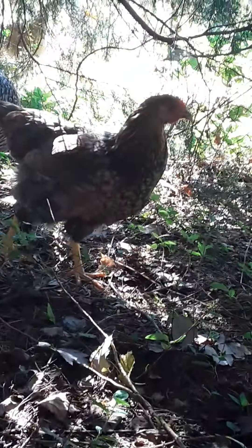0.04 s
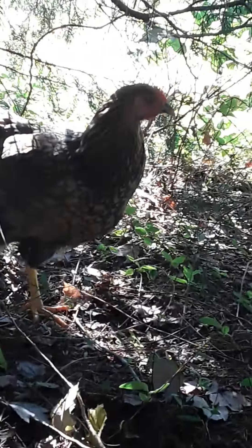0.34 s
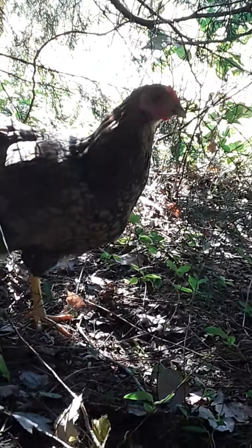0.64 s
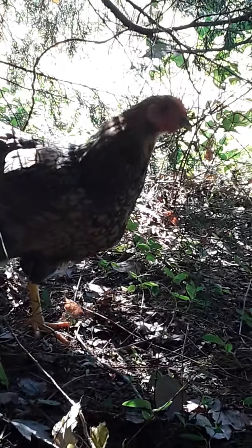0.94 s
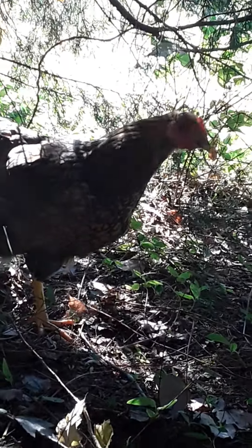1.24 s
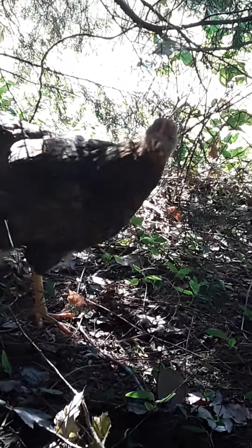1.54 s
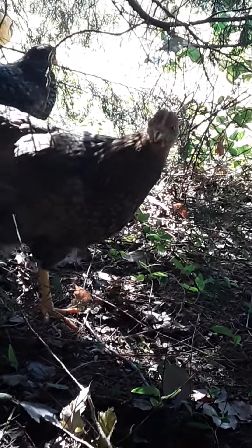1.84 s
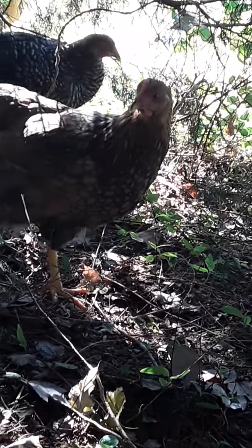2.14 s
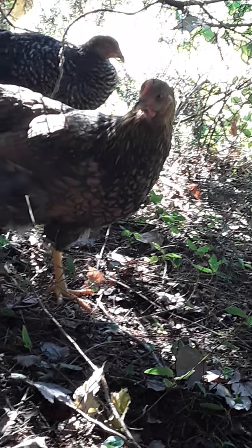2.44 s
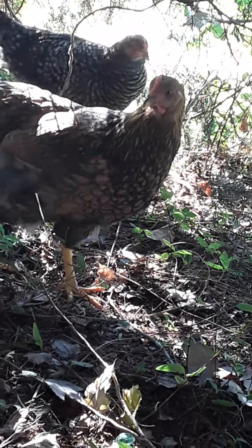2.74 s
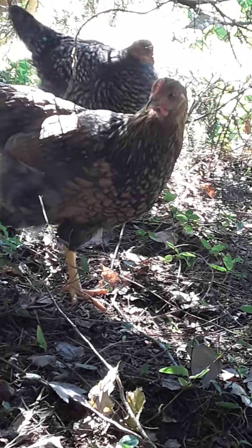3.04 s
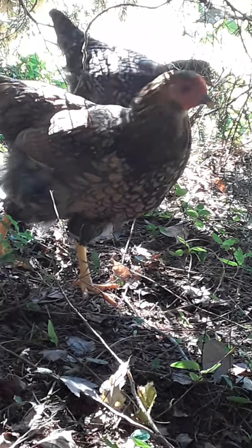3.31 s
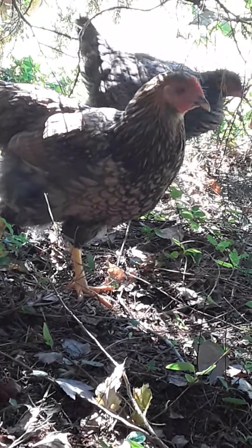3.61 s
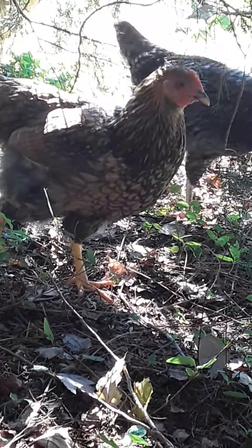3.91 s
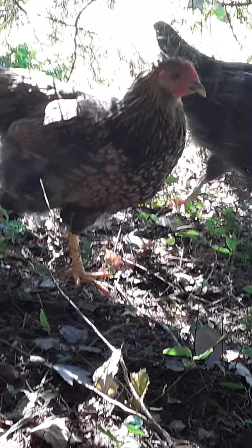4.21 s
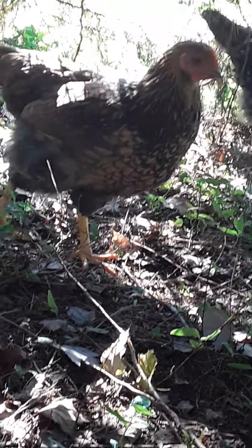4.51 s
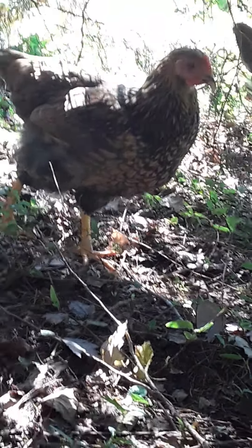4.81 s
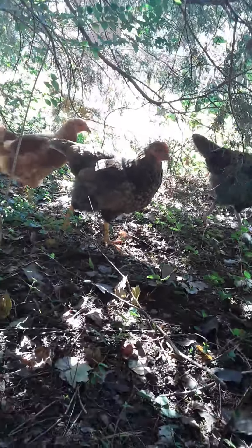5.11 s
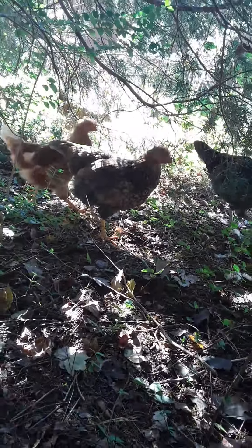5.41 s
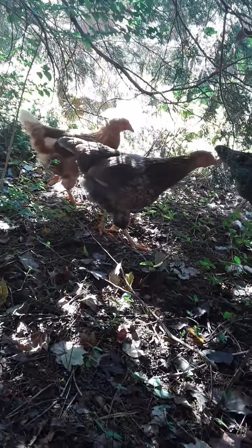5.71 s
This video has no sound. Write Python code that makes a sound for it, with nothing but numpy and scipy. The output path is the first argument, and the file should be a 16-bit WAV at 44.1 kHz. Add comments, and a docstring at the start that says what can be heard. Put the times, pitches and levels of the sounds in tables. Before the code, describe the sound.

Under trees, a cricket close to the microphone chirps in loud, high, rapid pulses over other crickets and a far rumble. At the start a hen's foot drags through dry leaves and twigs snap. A low-voiced hen softly croons, clucks and moans while a small bird twitters farther off. Later a higher hen clucks and whines. Near the end come more faint twitters and a brief close rustle.

```python
"""Under trees, one microphone by dry leaf litter. Throughout, a near cricket scrapes its wings in loud
pulses over slower neighbours, fast ground crickets and a far rumble. At the start a hen's foot drags
through the leaves and twigs snap. From 1 s a low-voiced hen croons, clucks and moans while a small bird
twitters farther off; from 3 s a high-voiced hen clucks and whines. Near 5 s the bird twitters again
and there is a brief close rustle, like a finger sliding by the microphone."""
import sys
import numpy as np
from scipy import signal
from scipy.fft import rfft, irfft, next_fast_len
from scipy.io import wavfile
from scipy.ndimage import map_coordinates

SR = 44100
rng = np.random.default_rng(int(sys.argv[2]) if len(sys.argv) > 2 else 0)


def bounce(signal):
    """Save signal as a 16-bit WAV file at the path given by the first command-line argument."""
    frames = np.transpose(np.atleast_2d(signal))
    limited = np.clip(frames, -1, 1)
    pcm = np.round(limited * 32767).astype(np.int16)
    wavfile.write(sys.argv[1], SR, pcm)


N = 262395
T = np.arange(N) / SR
CUTOFF_HZ = 15700


def from_db(db):
    """Decibels to gain."""
    return 10 ** (np.asarray(db) / 20)


def rms_one(x):
    """Scale to rms 1."""
    return x / np.sqrt(np.mean(x ** 2) + 1e-20)


def in_time(rows):
    """Each column of a timed curve at every sample."""
    times, *columns = np.transpose(rows)
    return [np.interp(T, times, column) for column in columns]


def gain_at(spectrum, hz):
    """Gain of a spectrum at any frequency."""
    points_hz, level_db = np.transpose(spectrum)
    return from_db(np.interp(np.log(hz + 1), np.log(points_hz), level_db))


def coloured(x, spectrum):
    """Give a signal a spectrum that falls away beyond its ends; rms 1."""
    size = next_fast_len(len(x) + SR // 10, True)
    hz = np.arange(size // 2 + 1) * SR / size
    skirts = np.minimum(1, hz / spectrum[0][0]) ** 2 / np.maximum(1, hz / spectrum[-1][0]) ** 6
    return rms_one(irfft(rfft(x, size) * gain_at(spectrum, hz) * skirts, size)[:len(x)])


def drift(per_s):
    """A smooth random curve that changes about per_s times a second; rms 1."""
    return rms_one(map_coordinates(rng.standard_normal(N // 8), [T * per_s + 2], order=3, mode="wrap"))


def phase_of(hz):
    """Phase of a moving pitch."""
    return 2 * np.pi * np.cumsum(hz) / SR


# Spectra of the distance. Each row: frequency in Hz, relative level in dB.
RUMBLE_SPECTRUM = [(20, -16), (28, -17), (45, -12.5), (68, -3.5), (92, 2), (120, -3), (150, -3.5),
                   (180, -10.5), (220, -16.5), (310, -23), (500, -30.5)]
AIR_SPECTRUM = [(250, -11), (500, 0.5), (1000, -3), (1800, -5.5), (2700, -4), (3800, 0), (5000, 4.5),
                (7000, -1), (10000, -39), (15000, -22)]
INSECT_SPECTRUM = [(4500, -17), (5500, 1), (6400, -3), (7000, 4.5), (7600, 1), (8000, -25), (8600, -7),
                   (9500, -63), (11000, -65)]


def background(rumble_db=-53, air_db=-61, insects_db=-53):
    """Far rumble, open air and the blur of many distant insects."""
    layers = [(RUMBLE_SPECTRUM, rumble_db), (AIR_SPECTRUM, air_db), (INSECT_SPECTRUM, insects_db)]
    return sum(from_db(db) * coloured(rng.standard_normal(N), spectrum) for spectrum, db in layers)


# Crickets far from the microphone. Each row: pitch in Hz, level in dB.
RING_TONES = [(5690, -63.5), (6070, -60.5), (7726, -51)]


def far_rings(waver_hz=28, flutter_db=3):
    """Many distant trills merge into thin, wavering tones."""
    out = 0
    for hz, level_db in RING_TONES:
        gain = from_db(level_db + flutter_db * drift(40))
        out += gain * np.sin(phase_of(hz + waver_hz * drift(120)))
    return out


# Crickets on the ground, some way off. Each row: strokes per second, start and end pitch in Hz,
# sounding share of each beat, level in dB.
GROUND_TRILLS = [(48.66, 7500, 6250, 0.3, -42.5), (54.86, 7830, 7300, 0.2, -38.5),
                 (74.6, 7300, 6400, 0.5, -46.5), (68.8, 7920, 7500, 0.6, -45.5)]


def ground_crickets(unsteady=0.04, swell_db=2.0, waver_hz=50, ramp_share=0.24, fading_db=7):
    """Fast trills of short wing strokes; each starts quickly, then slides down and fades."""
    out = 0
    for per_s, start_hz, end_hz, share, level_db in GROUND_TRILLS:
        strokes = np.cumsum(per_s * (1 + unsteady * drift(7))) / SR + rng.random()
        place = np.minimum(strokes % 1 / share, 1)  # 0 to 1 within a stroke
        ramps = np.minimum(np.minimum(place, 1 - place) / ramp_share, 1)
        envelope = ramps * from_db(fading_db * (0.5 - place))
        pitch = start_hz + (end_hz - start_hz) * place + waver_hz * drift(150)
        out += from_db(level_db + swell_db * drift(30)) * envelope * np.sin(phase_of(pitch))
    return out


# A small bird at a distance. Each row: start and length of a run in seconds, first note's level in dB.
TWITTER_RUNS = [(1.235, 0.15, -53), (1.673, 0.1, -48.5), (4.524, .126, -56), (4.946, .098, -52.5)]


def twitter_notes(every_s=0.028, note_s=0.0232, start_hz=3623, end_hz=3250, growth_db=1.0):
    """Evenly spaced falling notes, all much alike, that grow louder through each run."""
    notes = []
    for start, length, first_db in TWITTER_RUNS:
        for k in range(int(np.ceil(length / every_s))):
            tune = 1 + 0.0206 * rng.standard_normal()
            level_db = first_db + k * growth_db - 0.5 * rng.standard_normal()
            notes.append((start + k * every_s, tune * start_hz, tune * end_hz, note_s, level_db))
    return notes


# Lone distant chirps. Each row: start in seconds, start and end pitch in Hz, length in seconds,
# level in dB.
BIRD_CHIRPS = [(.29, 1830, 2230, 0.057, -58.5), (2.442, 8570, 7830, 0.041, -50.5),
               (3.298, 2060, 2140, 0.031, -55.5)]


def birds(waver_hz=45):
    """Twitters and chirps: short, nearly pure gliding notes."""
    out, waver = np.zeros(N), waver_hz * drift(600)
    for start, start_hz, end_hz, length, level_db in twitter_notes() + list(BIRD_CHIRPS):
        place = np.linspace(0, 1, int(length * SR))
        span = int(start * SR) + np.arange(len(place))
        pitch = start_hz + (end_hz - start_hz) * place + waver[span]
        out[span] += from_db(level_db) * np.sin(np.pi * place) * np.sin(phase_of(pitch))
    return out


def swell(peak_s, rise_s, fall_s):
    """A movement builds up to its peak and dies away."""
    return np.exp(-np.maximum((peak_s - T) / rise_s, (T - peak_s) / fall_s))


def dry_ticks(spectrum, per_s, spread_db):
    """Countless tiny ticks, as of dry leaves breaking, most faint and a few strong."""
    sizes = from_db(spread_db * np.minimum(rng.exponential(1, N), 4)) * rng.standard_normal(N)
    return coloured(sizes * (rng.random(N) < per_s / SR), spectrum)


# Brief close rustles: first a foot in the leaves, then near 5 s a sound like a sliding finger.
# Each row: peak time in seconds, relative level in dB, rise and fall in seconds.
CLOSE_RUSTLES = [(.15, -46.5, 0.022, 0.068), (4.885, -49, 0.052, 0.074), (5.338, -54.5, .022, 0.0097)]
# Light steps. Each row: peak time in seconds, relative level in dB, fall in seconds.
LIGHT_STEPS = [(.16, -68, 0.13), (.56, -72.5, .06), (1.52, -66.5, 0.017), (1.615, -69.5, 0.033),
               (1.745, -69.5, .07), (1.995, -72, 0.015), (2.97, -77, 0.034), (3.25, -74.5, 0.082),
               (3.71, -67.5, 0.089), (3.93, -71, 0.071), (4.24, -63.5, 0.06), (4.79, -65, 0.026),
               (4.94, -69, 0.06), (5.79, -71, 0.029)]
# The flock's constant stirring. Each row: time in seconds, relative level in dB.
FLOCK_STIR = [(0, -76), (1.2, -79.5), (2.4, -79.5), (2.9, -84), (4.1, -79), (5.1, -74), (5.7, -74),
              (5.95, -81.5)]
# The rustles' coarse crunch and the leaves' fine crackle. Each row: frequency in Hz, relative level in dB.
CRUNCH_SPECTRUM = [(200, -2), (450, -2.5), (1000, -10.5), (1500, 5.5), (2300, 6), (3300, 4), (4500, 2),
                   (7000, -23), (10000, -10), (15000, -33)]
CRACKLE_SPECTRUM = [(600, -6.5), (2000, -17.5), (3000, -3), (4000, 5.5), (6000, -7), (8500, 2),
                    (10500, -15), (13000, -13), (15500, -23)]


def rustling(crunch_db=2, crackle_db=17, step_rise_s=0.028):
    """Close rustles swell in coarse crunches; light steps lift the leaf litter's fine crackle."""
    rustles = sum(from_db(db) * swell(at, rise_s, fall_s) for at, db, rise_s, fall_s in CLOSE_RUSTLES)
    steps = [from_db(db) * swell(at, step_rise_s, fall_s) for at, db, fall_s in LIGHT_STEPS]
    stirring = np.linalg.norm(steps + [from_db(in_time(FLOCK_STIR)[0])], axis=0)  # powers add
    crunch = dry_ticks(CRUNCH_SPECTRUM, per_s=3200, spread_db=3.3)
    crackle = dry_ticks(CRACKLE_SPECTRUM, per_s=12000, spread_db=2.2)
    return from_db(crunch_db) * rustles * crunch + from_db(crackle_db) * stirring * crackle


# Twig snaps and pecks close by. Each row: start in seconds, peak level in dB, band centre in Hz.
TWIG_SNAPS = [(0.1361, -23, 3030), (0.164, -31, 3600), (.191, -32, 2460), (0.2162, -36, 2160),
              (0.388, -45, 3600), (1.607, -30, 3970), (1.742, -38, 4930), (2.1478, -29.5, 2900),
              (2.3122, -35.5, 3115), (2.7491, -44.5, 1010), (3.2693, -42.5, 3664), (4.9953, -37, 3070),
              (5.514, -42, 6000), (5.7848, -38, 4160)]


def snaps(fracture_s=0.001, rattle_db=-28, rattle_s=0.011):
    """A brief dry crack with a faint rattle after it; thinner twigs crack brighter."""
    out, t = np.zeros(N), T[:SR // 20]
    envelope = np.exp(-t / fracture_s) + from_db(rattle_db) * np.exp(-t / rattle_s)
    for start, peak_db, hz in TWIG_SNAPS:
        crack = rng.standard_normal(len(t)) * envelope
        highpass = signal.butter(2, hz / 2, "high", fs=SR, output="sos")
        lowpass = signal.butter(4, min(1.76 * hz, CUTOFF_HZ), fs=SR, output="sos")
        snap = signal.sosfilt(lowpass, signal.sosfilt(highpass, crack))
        at = int(start * SR)
        out[at:at + len(t)] += from_db(peak_db) * snap / np.abs(snap).max()
    return out


def hen_voice(call, throat, jitter, doubling, rasp_db, shimmer_db, tight_db=0,
              tight_hz=1057, tight_width_hz=150, fade_s=0.0056):
    """Harmonics of the syrinx through the throat; when hoarse it shakes, rasps and doubles its period."""
    gate = np.clip(np.minimum(T - call[0][0], call[-1][0] - T) / fade_s, 0, 1)
    live = gate > 0
    pitch, level_db, hoarse = [curve[live] for curve in in_time(call)]
    shake = drift(420) + 0.5 * drift(130)
    pitch = pitch * (1 + (0.0055 + jitter * hoarse) * shake[live])
    phase = phase_of(pitch)
    multiples = np.arange(1, 17)[:, None] / 2  # harmonics and the half steps of a doubled period
    partial_hz = multiples * pitch
    # a tight throat gathers the sound in one resonance; a negative tight_db thins that band
    squeeze = from_db(tight_db * hoarse / (1 + ((partial_hz - tight_hz) / tight_width_hz) ** 2))
    gains = gain_at(throat, partial_hz) * squeeze * np.where(multiples % 1, doubling * hoarse, 1)
    partials = np.sin(multiples * phase + rng.uniform(0, 2 * np.pi, multiples.shape))
    voice = (gains * partials).sum(axis=0) / np.sqrt((gains ** 2).sum(axis=0) / 2)
    breath = coloured(rng.standard_normal(len(pitch)), throat)
    rasp = from_db(rasp_db) * (hoarse + 0.071) * breath * (1 + np.sin(phase) / 2)
    out = np.zeros(N)
    out[live] = (voice + rasp) * from_db(level_db + shimmer_db * drift(220)[live])
    return out * gate


def cluck(start, length, start_hz, end_hz, level_db, hoarse, edge_db=-5.5):
    """The curve of a very short call that swells and fades while it drops in pitch."""
    return [(start, start_hz, level_db + edge_db, hoarse),
            (start + length / 2, (start_hz + end_hz) / 2, level_db, hoarse),
            (start + length, end_hz, level_db + edge_db, hoarse)]


# Throats of the two hens. Each row: frequency in Hz, relative gain in dB.
LOW_THROAT = [(330, -4), (480, -9), (600, -4), (900, -2), (1200, 1), (1850, 0), (2450, -7), (2750, -15),
              (3150, -22), (3650, -6), (3900, -12), (4250, -22), (6000, -40)]
HIGH_THROAT = [(400, -24), (950, 5.5), (1400, -8), (2000, -19), (2400, -7.5), (3100, -19.5), (3600, 0.5),
               (4100, -10), (4400, -18), (5500, -31)]
# Long calls. Each row: time in seconds, pitch in Hz, level in dB, hoarseness (0 clear, about 1 rough).
CROON_CURVE = [(1.006, 868, -60, 0.7), (1.034, 843, -55, 0), (1.15, 892, -55, 0.07),
               (1.165, 1124, -66, 0.2), (1.19, 1170, -55, 0)]
MOAN_CURVE = [(1.267, 669, -49, 0.86), (1.325, 654.7, -48, 0.86), (1.385, 629, -47.5, 0.13),
              (1.452, 648.5, -46, 0.099), (1.49, 618.5, -47, .09), (1.55, 609, -47, 0.045),
              (1.61, 587, -46, .05), (1.70, 574, -45, 0.089), (1.728, 640, -47.5, 0.27),
              (1.744, 880, -50, .4)]
WHINE_CURVE = [(3.478, 1183, -55.5, 0.45), (3.62, 1335, -55.5, 0.064), (3.755, 1368, -51.5, 0.091),
               (3.795, 1311, -52.5, 0.5), (3.83, 1420, -56, 0.54), (3.91, 1443, -54.5, 0.27),
               (3.945, 1210, -51, 0.48), (4.035, 1184, -51, .4), (4.058, 1370, -55, .3),
               (4.08, 1260, -56, 0.26)]
# Clucks. Each row: start and length in seconds, start and end pitch in Hz, level in dB, hoarseness.
LOW_HEN_CLUCKS = [(1.187, .042, 751, 722, -46, 1.1), (1.228, 0.019, 700, 650, -54, 0.7)]
HIGH_HEN_CLUCKS = [(3.131, .045, 1080, 950, -45, .5), (3.325, 0.043, 1139, 872, -49, 0.2),
                   (4.08, 0.02, 1040, 906, -57, 0.48)]


def hens():
    """Near the microphone a low-voiced hen croons, clucks and moans; a high one clucks and whines."""
    out = np.zeros(N)
    for call in (CROON_CURVE, MOAN_CURVE):
        out += hen_voice(call, LOW_THROAT, jitter=0.027, doubling=1.0, rasp_db=-9.5, shimmer_db=1.0,
                         tight_db=14)
    for row in LOW_HEN_CLUCKS:
        out += hen_voice(cluck(*row), LOW_THROAT, jitter=0.03, doubling=0.95, rasp_db=-11, shimmer_db=2.7)
    out += hen_voice(WHINE_CURVE, HIGH_THROAT, jitter=0.03, doubling=0.097, rasp_db=-4, shimmer_db=0.5)
    for row in HIGH_HEN_CLUCKS:
        out += hen_voice(cluck(*row), HIGH_THROAT, jitter=0.037, doubling=0.11, rasp_db=-3,
                         shimmer_db=1.8, tight_db=-7)
    return out


def cricket(beat, stroke, lag_s, octave_db, waver_hz=18, flutter_db=0.3):
    """Each wing stroke draws the file over the scraper: a tone that arches with the stroke's speed."""
    first_s, per_s = beat
    top_hz, sag_hz, fall_hz, length, rise_share, fade_share = stroke
    from_middle_s = (((T - lag_s - first_s) * per_s + 0.5) % 1 - 0.5) / per_s
    place = np.clip(2 * from_middle_s / length, -1, 1)  # -1 to 1 within a stroke
    envelope = np.clip(np.minimum((1 + place) / (2 * rise_share), (1 - place) / (2 * fade_share)), 0, 1)
    waver = waver_hz * (drift(400) + 0.268 * drift(10))
    phase = phase_of(top_hz - sag_hz * place ** 2 - fall_hz * place / 2 + waver)
    tone = np.sin(phase) + from_db(octave_db) * np.sin(2 * phase)
    return envelope * from_db(flutter_db * drift(250)) * tone


# The two crickets closest to the microphone. Each row: time in seconds, lag behind an even beat in
# seconds, level in dB.
NEAREST_CRICKET = [(0, -0.00025, -29.5), (.4, 0.0012, -29), (1.45, -.002, -27), (1.9, -0.0024, -28),
                   (2.5, -0.00062, -30), (3.1, -0.002, -28.5), (4.0, -0.0016, -28.5), (4.4, 0.0016, -28.5),
                   (5.95, .0016, -29)]
SECOND_CRICKET = [(0, 0.0037, -39.5), (1.5, -.004, -39.5), (2.2, .002, -41), (3.1, 0.009, -42),
                  (3.75, -0.0016, -41.5), (4.8, -0.0018, -41.5), (5.95, -0.0064, -42.5)]
# The four farther off. Each entry: level in dB.
FAR_LEVELS_DB = [-46.5, -48, -61.5, -54]
# Beats of all six, nearest first. Each row: middle of the first stroke in seconds, strokes per second.
WING_BEATS = [(.0566, 11.418), (.0275, 10.241), (.033, 8.474), (.1203, 7.318), (.0171, 9.3), (.0651, 9.431)]
# Their strokes. Each row: mid-stroke pitch, sag at the ends and fall across it in Hz, length in seconds,
# shares of that length spent rising and fading.
WING_STROKES = [(7345, 200, 0, .0236, .1, .12), (6205, 200, -30, .026, .12, .24),
                (5068, 230, 230, .04, .15, .33), (5285, 130, 130, .034, .2, .35),
                (5640, 50, 30, .032, .3, .3), (5750, 50, 30, .03, .3, .3)]
# Their overtones an octave up. Each entry: level against the main tone in dB.
OVERTONES_DB = [-60, -44, -55, -34, -13.5, -25]


def crickets(wander_s=0.002, wander_db=1.4):
    """Two close singers, and four farther off whose beat and level wander a little; (near, far)."""
    near = [in_time(NEAREST_CRICKET), in_time(SECOND_CRICKET)]
    far = [(wander_s * drift(1.9), level_db + wander_db * drift(2.97)) for level_db in FAR_LEVELS_DB]
    singers = zip(WING_BEATS, WING_STROKES, OVERTONES_DB, near + far)
    songs = [from_db(level_db) * cricket(beat, stroke, lag_s, octave_db)
             for beat, stroke, octave_db, (lag_s, level_db) in singers]
    return sum(songs[:2]), sum(songs[2:])


def with_ground_bounce(x, delay_s=0.0045, bounce_db=-15):
    """A bounce off the ground meets the direct sound at the microphone and beats against each glide."""
    return x + from_db(bounce_db) * np.interp(T - delay_s, T, x, left=0)


def tree_echoes(x, t60_s=0.37):
    """Trunks and branches scatter a short, thin tail of echoes."""
    t = T[:SR // 2]
    reflections = rng.standard_normal(len(t)) * (rng.random(len(t)) < 0.05) * (t > 0.003)
    tail = reflections * np.exp(-np.log(1000) * t / t60_s)
    return signal.fftconvolve(x, tail / np.sqrt(np.sum(tail ** 2)))[:N]


def scene(near_wet_db=-20, far_wet_db=-12, yard_wet_db=-21, bird_wet_db=-9):
    """Distant singers reach the microphone with more echo than those close by."""
    near, far = crickets()
    far = far + ground_crickets() + far_rings()
    birdsong = birds()
    yard = hens() + rustling() + snaps()
    echoes = tree_echoes(from_db(near_wet_db) * near + from_db(far_wet_db) * far
                         + from_db(yard_wet_db) * yard + from_db(bird_wet_db) * birdsong)
    return (with_ground_bounce(near) + far + birdsong + yard + echoes + background())[None]


def record(dry):
    """One microphone channel, its highest treble cut steeply."""
    return signal.sosfilt(signal.ellip(10, 0.1, 80, CUTOFF_HZ, fs=SR, output="sos"), dry)


dry = scene()
out = record(dry)
bounce(out)
```